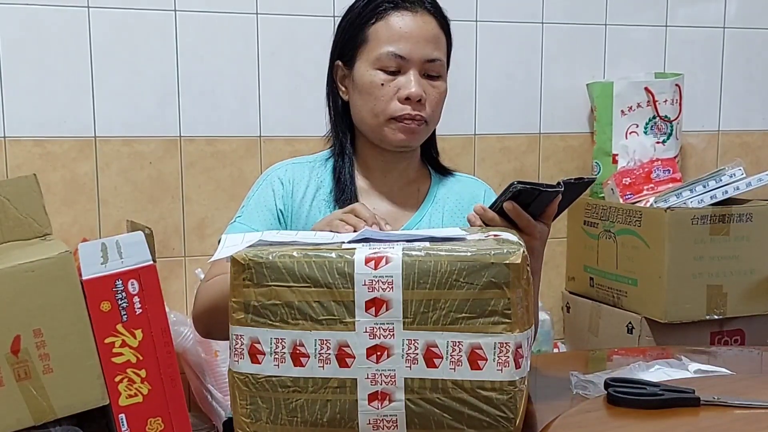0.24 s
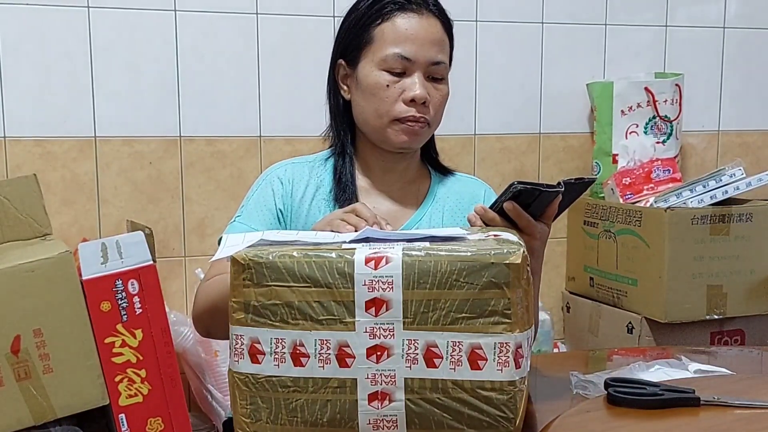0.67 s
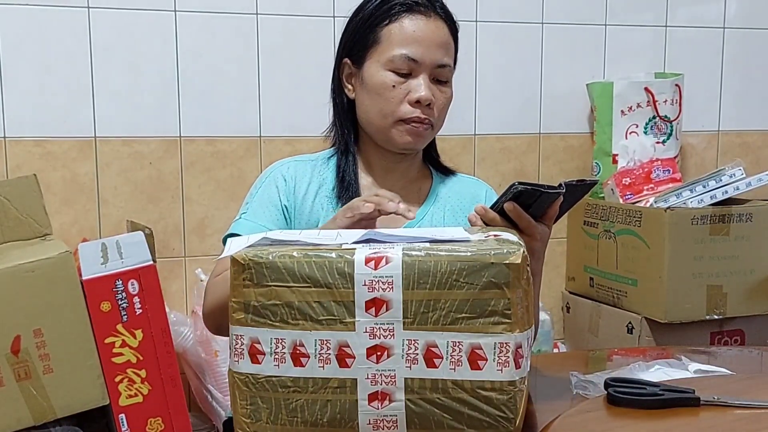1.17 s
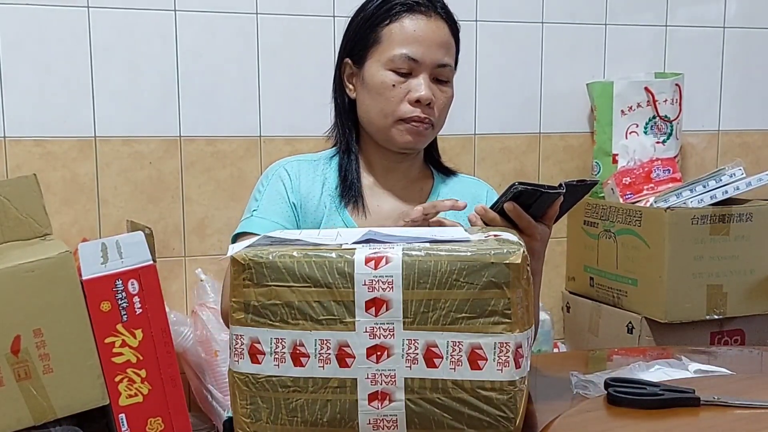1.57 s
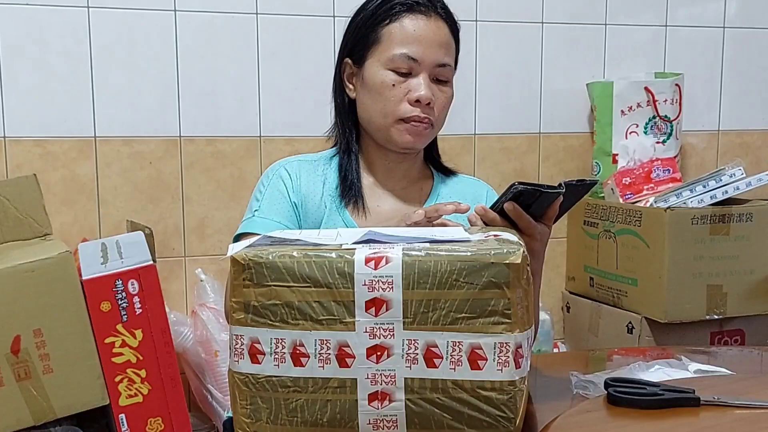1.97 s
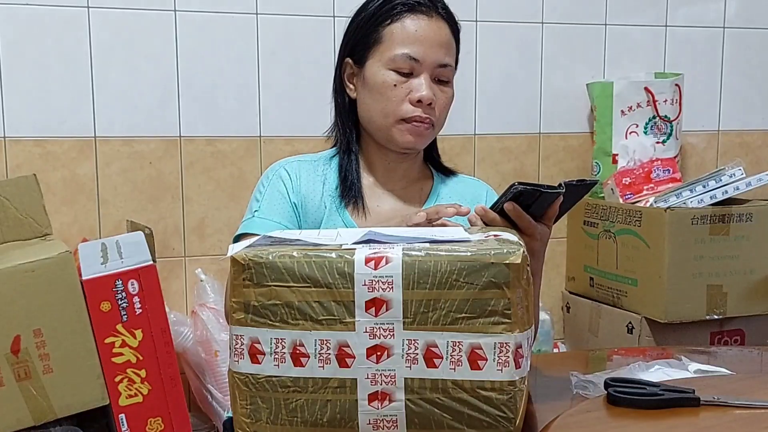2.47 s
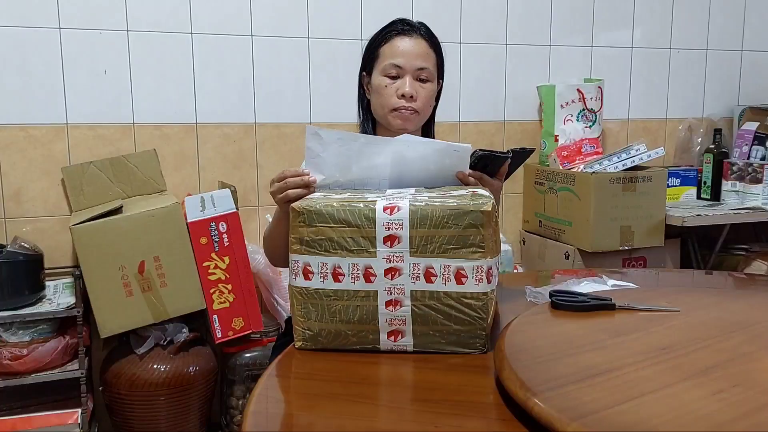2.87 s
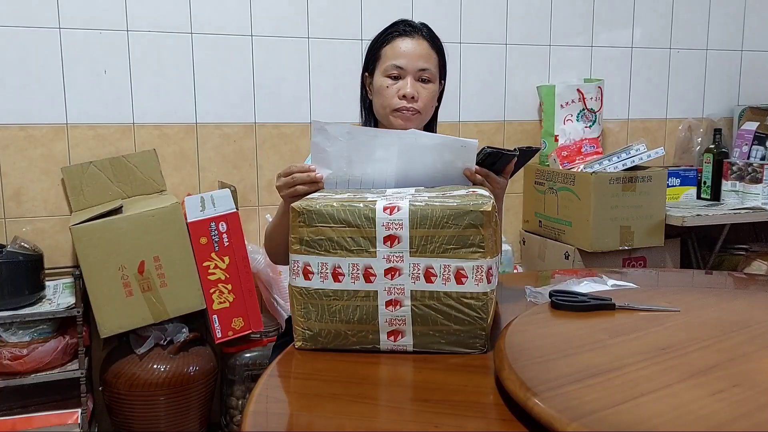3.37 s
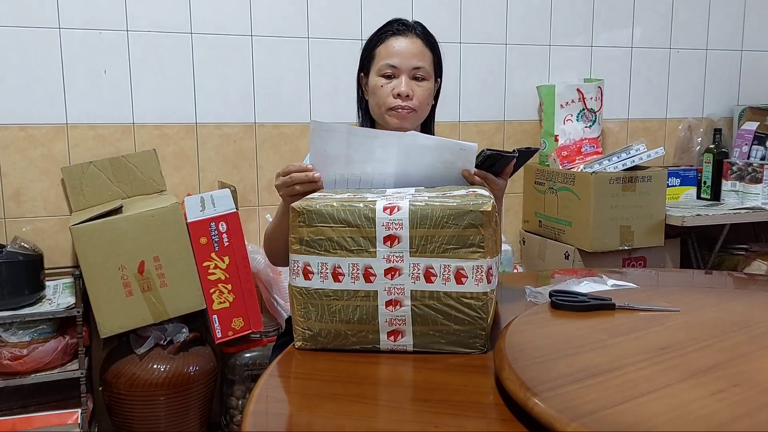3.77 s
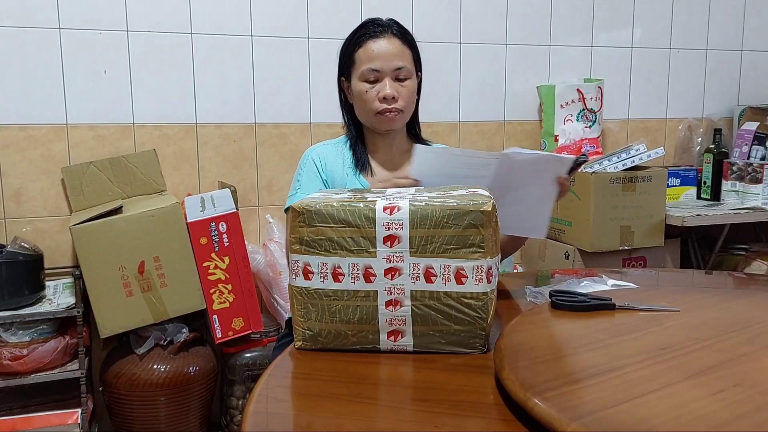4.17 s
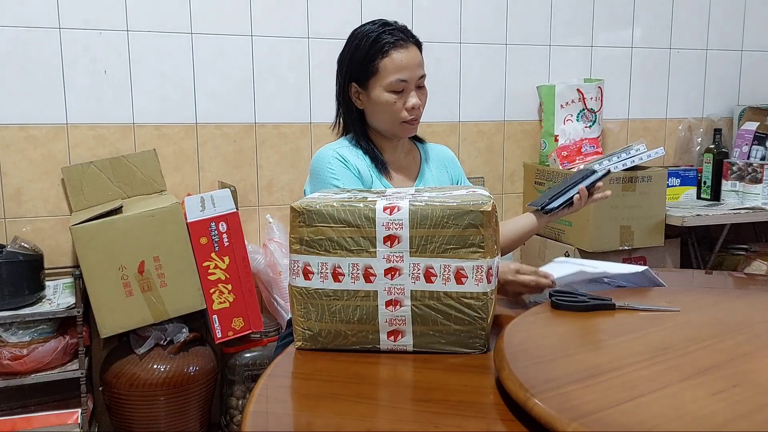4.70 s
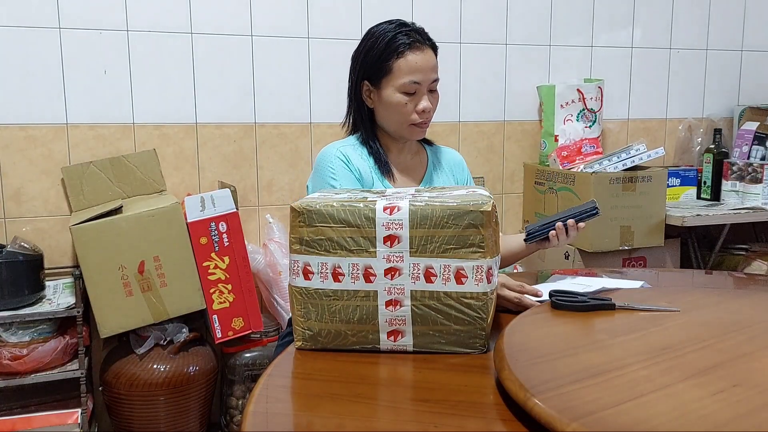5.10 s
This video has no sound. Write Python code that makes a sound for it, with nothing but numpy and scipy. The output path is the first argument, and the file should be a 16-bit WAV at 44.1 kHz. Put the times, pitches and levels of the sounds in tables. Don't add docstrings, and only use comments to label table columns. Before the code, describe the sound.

In a hard tiled room, a compressor and fan drone steadily, low and tonal with a thin buzzing whine and slow rumbling surges. At about the midpoint the scene cuts: the rumble drops and the fan pitch rises slightly. Paper then rustles softly with a crisp snap, and finally drags and flicks onto a table. Stereo phone microphone, no speech.

```python
import sys
import numpy as np
from scipy import signal
from scipy.fft import rfft, irfft
from scipy.io import wavfile
from scipy.ndimage import uniform_filter1d

SR = 44100
rng = np.random.default_rng(int(sys.argv[2]) if len(sys.argv) > 2 else 0)


def attenuation_scalar(level_db):
    decades = np.asarray(level_db, float) / 20
    return 10 ** decades


def waveform_to_disk(signal):
    frames = np.transpose(np.atleast_2d(signal))
    scaled = np.clip(frames, -1, 1) * 32767
    samples = np.round(scaled).astype(np.int16)
    wavfile.write(sys.argv[1], SR, samples)


N = 235746
CHANGE_S = 2.85

# frequency in Hz, level in dB per Hz.
AIR_SPECTRUM = [(25, -87), (40, -69), (100, -71), (160, -71), (300, -67.5), (410, -63), (480, -74.5),
                (700, -81.5), (1000, -84.5), (1500, -91), (2600, -90.5), (5000, -93), (6500, -97.5),
                (15000, -99)]
# frequency in Hz, width in Hz, lift in dB.
ROOM_MODES = [(83, 7, 8), (137, 8, 9), (193, 14, 7.5), (232, 12, 9), (283, 10, 12), (333, 16, 8),
              (383, 10, 5), (425, 14, 4), (506, 11, 6), (580, 30, 4), (710, 50, 3.5), (772, 20, 5),
              (860, 30, 4), (958, 22, 7), (1040, 40, 4), (1150, 60, 4), (1280, 30, 4), (2860, 22, 6),
              (4138, 30, 11), (4460, 140, 5), (5185, 40, 6), (5553, 45, 8), (5735, 55, 7), (11400, 300, 2),
              (13470, 150, 4), (3580, 330, 4.5), (8000, 500, 2)]
# frequency in Hz, likeness 0-1.
PORT_COHERENCE = [(40, .9), (100, .96), (200, .96), (350, .88), (500, .7), (800, .45), (1400, .4),
                  (2200, .3), (3500, .25), (6000, .12), (15000, .03)]
# frequency in Hz, left minus right in dB.
PORT_TILT = [(40, 8), (100, 4), (160, 2.5), (500, -0.5), (1200, 3.5), (2200, 4), (3300, 1.5), (8000, -1),
             (11000, -3.5)]
# time in seconds, compressor shaft, mains ripple, second motor, fan blade rate in Hz.
SPEEDS = [
    (0, 58.805, 120, 81.8, 190.87),
    (1.5, 58.8, 120, 81.8, 190.87),
    (2.84, 58.783, 120, 81.8, 190.87),
    (2.85, 58.783, 119.95, 81.43, 192.65),
    (5.35, 58.755, 119.95, 81.43, 192.45),
]
# shaft order, left level in dB, right
# level in dB, left lead in radians.
SHAFT_HUM = [(2, -43.0, -47.0, -0.1), (3, -59.0, -63.0, -0.5), (4, -55.0, -53.0, -0.1), (5, -49, -50, 0.2),
             (6, -49.0, -53.0, 0.8), (7, -52.0, -54.0, -0.4), (8, -57.0, -52.0, -1.6),
             (9, -66.0, -57.0, -1.7), (10, -68.0, -77.0, -0.7), (11, -56.5, -63.0, -0.6),
             (12, -83.0, -68.0, -0.0), (14, -62.5, -60.5, 1.9), (16, -67.0, -67.0, -2.3),
             (17, -63.0, -68.0, -1.3),
             (13, -59.5, -60.5, -.8)]
# shaft order, left level in dB, right level in dB,
# left lead in radians.
SHELL_WHINE = [(30, -87.0, -75.0, 1.2), (46, -78.0, -69.0, -2.8), (48, -70.0, -68.0, 3.0),
               (49, -73.0, -76.0, -0.3), (55, -69.0, -79.0, 1.5), (57, -74.0, -78.0, 0.1),
               (58, -62.0, -63.0, -1.1), (60, -63.0, -60.0, 2.1), (61, -56.0, -59.0, 0.7),
               (62, -64.0, -60.0, -1.5), (63, -66.0, -64.0, -1.2), (64, -66.0, -58.0, -0.7),
               (65, -74.0, -78.0, -2.0), (66, -75.0, -74.0, -2.2), (71, -63.0, -69.0, -2.0),
               (74, -83.0, -69.0, -2.0), (89, -76.0, -67.5, 1.3), (110, -86.0, -79.0, 2.3)]
# ripple multiple, motor multiple, left level in dB, right level in dB,
# left lead in radians.
MOTOR_BEATS = [(1, 0, -52.0, -58.0, 0.2), (2, 0, -52.0, -58.0, 0.8), (3, 0, -43.0, -48.0, 0.1),
               (4, 0, -59, -61, -2.6), (5, 0, -71.0, -77.0, -1.4), (1, -1, -66.0, -74.0, -0.2),
               (1, 1, -49, -47, -0.1), (1, 2, -46.0, -44.0, -0.1), (2, 1, -52, -55, 2.7),
               (3, -2, -53.0, -51.0, -0.1), (3, -1, -61, -54, -1.8), (3, 1, -58.0, -61.0, -0.4),
               (4, -2, -49, -58, -0.1), (4, -1, -50.0, -48.0, -0.1), (5, -2, -58.0, -58.0, -0.7),
               (5, -1, -63, -67, -1.1)]
# blade multiple, left level in dB, right level in dB, left lead in radians.
BLADE_TONES = [(1, -37, -36, -.3), (2, -48, -48, -.5), (3, -68, -61, -1.0), (4, -59, -63, -2.0),
               (5, -67, -66, -2.4)]
# peak time in seconds, half length in seconds, lift in dB.
GUSTS = [
    (1.4, 1, 2.5),
    (2.95, 0.56, 3.5),
    (3.547, 0.35, 3.5),
    (4.28, 0.18, 9),
    (4.75, 0.33, 6),
]
# frequency in Hz, level in dB per Hz.
SHEET_SPECTRUM = [(500, -30), (900, -1), (1500, 0), (2600, -1.5), (4000, -2), (8000, -3.5), (11000, -4),
                  (15000, -4)]
# start in seconds, rise in seconds, hold in seconds, rubbing level in dB,
# flat contact with the table 0-1.
STROKES = [
    (2.87, 0.1, .06, -53, 1),
    (3.027, .008, .01, -49.5, 0.9),
    (3.8, 0.22, .02, -50, .7),
    (4.08, .22, .12, -48.5, 0.3),
    (4.633, .01, 0.095, -45.5, 0.24),
    (4.758, .03, .01, -47.5, 1),
    (4.868, .01, 0.046, -44, 0.05),
    (4.891, 0.038, 0.045, -44.5, 0.96),
]
# time in seconds, frequency in Hz, lift in dB.
FLAPS = [
    (4.67, 1720, 11),
    (4.8, 1080, 15),
    (4.95, 930, 14),
    (4.93, 2500, 1),
    (5.01, 2300, 11),
]
# time in seconds, peak in dB, centre in Hz, width in Hz.
SNAPS = [
    (3.0337, -33.5, 12000, 9000),
    (3.7630, -36, 6200, 1200),
    (4.016, -46, 4500, 3000),
    (4.642, -44, 5000, 4000),
    (4.877, -46, 8000, 6000),
    (4.921, -35, 2400, 900),
]


def evened(x):
    return x / np.sqrt(np.mean(x ** 2) + 1e-20)


def read(points, hz):
    f, value = np.transpose(points)
    return np.interp(np.log(hz + 1), np.log(f + 1), value)


def speed_curve(column):
    return np.interp(np.arange(N) / SR, [r[0] for r in SPEEDS], [r[column] for r in SPEEDS])


def drift(top_hz):
    points = rng.standard_normal(400)
    steps = np.arange(N) / SR * top_hz
    return np.interp(steps, np.arange(400), points) * 1.22


def port_noise(gain, same, size, ripple_db):
    hz = np.fft.rfftfreq(size, 1 / SR)
    a, b, c, d = rng.standard_normal((4,) + gain.shape)
    same = np.clip(same, 0, 1)
    right = a + 1j * b
    lag = 14
    late = np.exp(-2j * np.pi * hz * lag / SR)
    left = late * same * right + np.sqrt(1 - same ** 2) * (c + 1j * d)
    half_tilt_db = read(PORT_TILT, hz) / 2
    z = np.array([left * attenuation_scalar(half_tilt_db), right * attenuation_scalar(-half_tilt_db)]) * gain
    ripple = evened(uniform_filter1d(rng.standard_normal((2, 1, len(hz))), size // 400 + 1, axis=2))
    z *= attenuation_scalar(ripple_db * ripple * (hz > 500))
    z *= np.sqrt(SR / size) * 1.225
    return signal.istft(z.swapaxes(1, 2), nperseg=size, noverlap=size * 3 // 4)[1][:, :N]


def rumble_db(t):
    period_s, surge_db, fade_db_per_s, trough_db, after_db = .71, 11, 2, -8.5, -7
    surge = (1 + np.cos(2 * np.pi * t / period_s)) / 2
    before = trough_db + surge * (surge_db - fade_db_per_s * t)
    return np.where(t < CHANGE_S + period_s / 4, before, after_db)


def air():
    hz = np.fft.rfftfreq(8192, 1 / SR)
    frames = N // 2048 + 6
    power_lift = 1
    for f, width, db in ROOM_MODES:
        resonance = 1 / (1 + (1.29 * (hz - f) / width) ** 2) ** 2
        power_lift = power_lift + (attenuation_scalar(2 * db) - 1) * resonance
    patches = evened(uniform_filter1d(rng.standard_normal((frames, len(hz))), 60, axis=1))
    rumble = np.outer(rumble_db(np.arange(frames) * 2048 / SR), hz < 110)
    gain = attenuation_scalar(read(AIR_SPECTRUM, hz) + 0.68 * patches + rumble) * np.sqrt(power_lift)
    return port_noise(gain, read(PORT_COHERENCE, hz), size=8192, ripple_db=1.7)


def tone(turns, left_db, right_db, lead, waver_db, waver_hz, wobble, start=None):
    ports = np.array([attenuation_scalar(left_db) * np.exp(1j * lead), attenuation_scalar(right_db)])
    ports = ports * np.exp(-1j * np.angle(ports.sum()))
    start = rng.random() if start is None else start
    phase = 2 * np.pi * (turns + start) + wobble * drift(waver_hz)
    level = np.sqrt(2) * attenuation_scalar(waver_db * drift(waver_hz))
    return np.outer(ports.real, level * np.sin(phase)) + np.outer(ports.imag, level * np.cos(phase))


def faint_orders(shaft, level_db, spread_db):
    orders = np.arange(257)
    db = read(AIR_SPECTRUM, orders * SPEEDS[0][1]) + level_db + spread_db * rng.standard_normal((2, 257))
    phases = np.exp(2j * np.pi * rng.random((2, 257)))
    cycle = irfft(attenuation_scalar(db) * (orders > 19) * phases, 4096) * 2048
    place = (shaft + 0.00055 * drift(4.7)) % 1 * 4096
    return np.array([np.interp(place, np.arange(4096), c, period=4096) for c in cycle])


def compressor(shaft):
    hum = sum(tone(k * shaft, *ports, waver_db=.6, waver_hz=3, wobble=.12)
              for k, *ports in SHAFT_HUM)
    strokes = 3
    whine = sum(tone(k * shaft, *ports, waver_db=1.5, waver_hz=11, wobble=.4, start=k * k / (2 * strokes))
                for k, *ports in SHELL_WHINE)
    return hum + attenuation_scalar(.8) * whine + faint_orders(shaft, level_db=9.5, spread_db=3.5)


def motor_beats(ripple, motor):
    return sum(tone(m * ripple + n * motor, *ports, waver_db=1.63, waver_hz=3.07, wobble=0.34)
               for m, n, *ports in MOTOR_BEATS)


def fan_db():
    t = np.arange(N) / SR
    rest_db = -2
    return rest_db + sum(db * np.clip(1 - abs(t - s) / half, 0, 1) for s, half, db in GUSTS)


def fan(blade):
    swing = 0.12 * drift(2.633)
    tones = sum(tone(k * (blade + swing), *ports, waver_db=.9, waver_hz=4, wobble=.1)
                for k, *ports in BLADE_TONES)
    return attenuation_scalar(fan_db()) * tones


def machines():
    shaft, ripple, motor, blade = (np.cumsum(speed_curve(k)) / SR for k in range(1, 5))
    return compressor(shaft) + motor_beats(ripple, motor) + fan(blade)


def strokes():
    t = np.arange(N) / SR
    held_db, release_db_per_s = -56.5, 127
    power = attenuation_scalar(2 * held_db) * np.clip((t - CHANGE_S) / .1, 1e-3, 1)
    contact = power
    for start, rise, hold, db, flat in STROKES:
        fall_db = release_db_per_s * np.maximum(t - start - rise - hold, 0)
        stroke = np.clip((t - start) / rise, 0, 1) ** 2 * attenuation_scalar(2 * (db - fall_db))
        power = power + stroke
        contact = contact + np.clip(flat, 0, 1) * stroke
    return np.sqrt(power), contact / power


def rubbing():
    hz = np.fft.rfftfreq(256, 1 / SR)
    frames = N // 64 + 6
    slips_db = 1.1 * evened(uniform_filter1d(rng.standard_normal((frames, 1)), 3, axis=0))
    creases = uniform_filter1d(rng.standard_normal((frames, len(hz))), 24, axis=0)
    creases_db = 1.3 * evened(uniform_filter1d(creases, 6, axis=1))
    level, contact = strokes()
    contact = np.resize(contact[::64], frames)[:, None]
    table_hz, table_width_hz, table_db = 2100, 1400, 6.5
    lift_db = table_db * contact / (1 + (2 * (hz - table_hz) / table_width_hz) ** 2)
    frame_s = np.arange(frames)[:, None] * 64 / SR
    flap_s, flap_width_hz = 0.03, 200
    for s, f, db in FLAPS:
        lift_db += db * np.exp(-((frame_s - s) / flap_s) ** 2 - ((hz - f) / flap_width_hz) ** 2)
    gain = attenuation_scalar(read(SHEET_SPECTRUM, hz) + slips_db + creases_db + lift_db)
    return level * evened(port_noise(gain, .3, size=256, ripple_db=0))


def snaps():
    out = np.zeros((2, N))
    t = np.arange(600) / SR
    for s, db, centre_hz, width_hz in SNAPS:
        ring = np.sin(2 * np.pi * centre_hz * t) * np.exp(-np.pi * width_hz * t)
        cracks = rng.standard_normal((2, 600)) * np.exp(-t / 0.00081)
        shared = cracks + cracks[::-1] / 2
        snap = signal.fftconvolve(shared, ring[None], axes=1)[:, :600]
        out[:, round(s * SR):][:, :600] += attenuation_scalar(db) * snap / abs(snap).max()
    return out


def paper():
    return rubbing() + snaps()


def scene():
    return air() + machines() + paper()


def low_pass(x):
    return signal.sosfilt(signal.butter(12, 15530, fs=SR, output="sos"), x)


def record(dry):
    hz = np.fft.rfftfreq(N, 1 / SR)
    edge_hz, dull_db = 11700, -7
    dull = attenuation_scalar(dull_db * np.clip((hz - edge_hz) / 300 + .5, 0, 1))
    left = irfft(rfft(dry[0]) * dull, N)
    return low_pass(np.array([left, dry[1]]))


dry = scene()
out = record(dry)
waveform_to_disk(out)
```